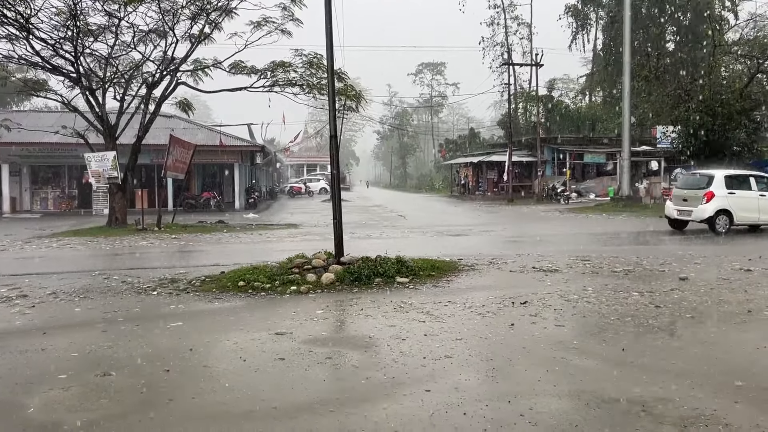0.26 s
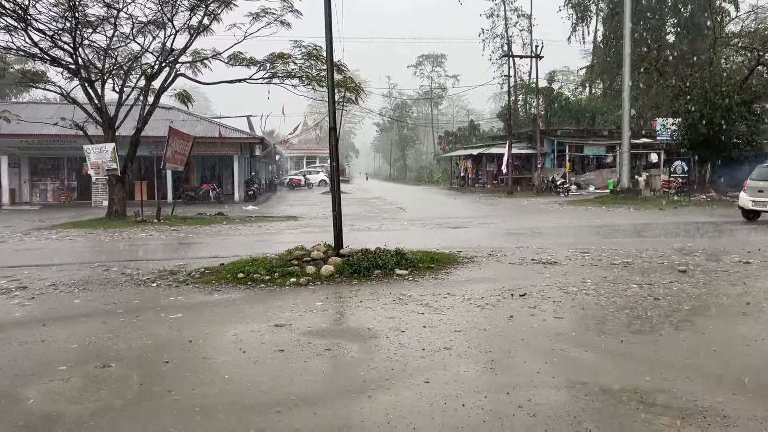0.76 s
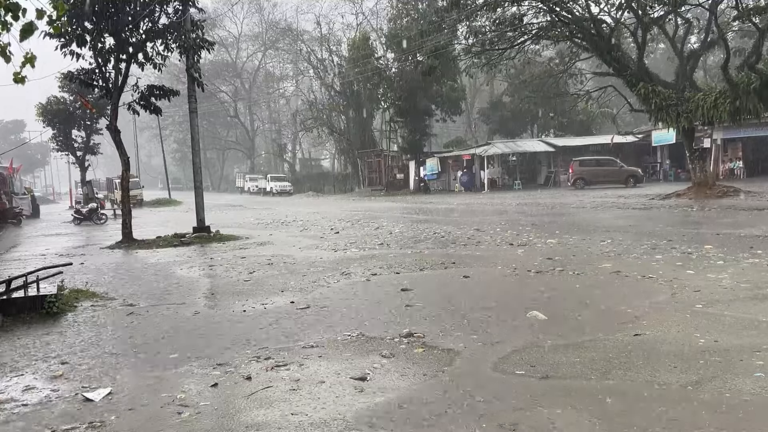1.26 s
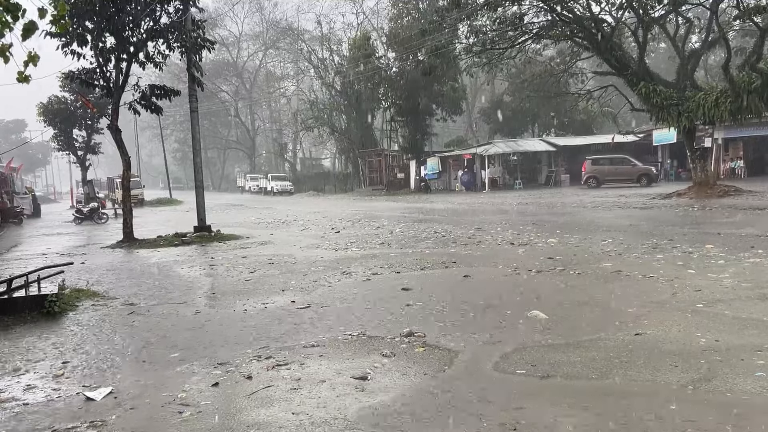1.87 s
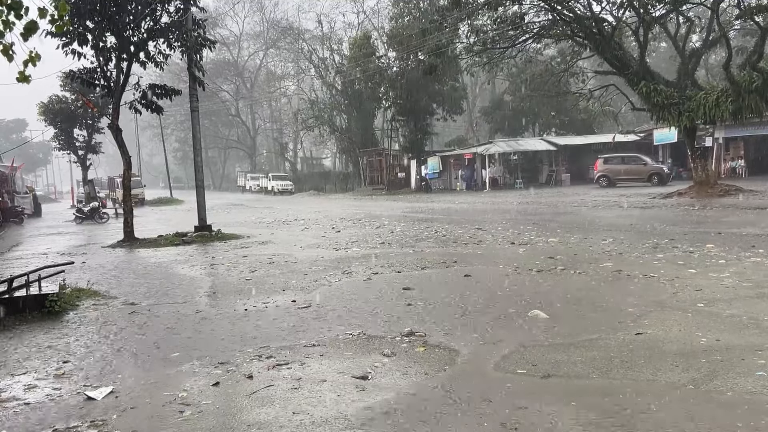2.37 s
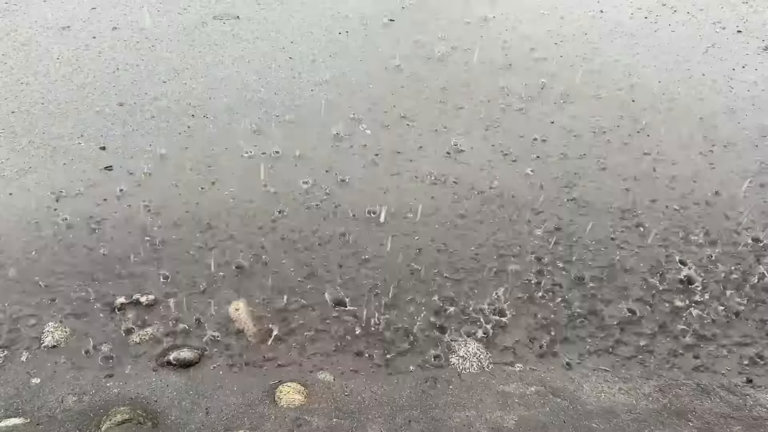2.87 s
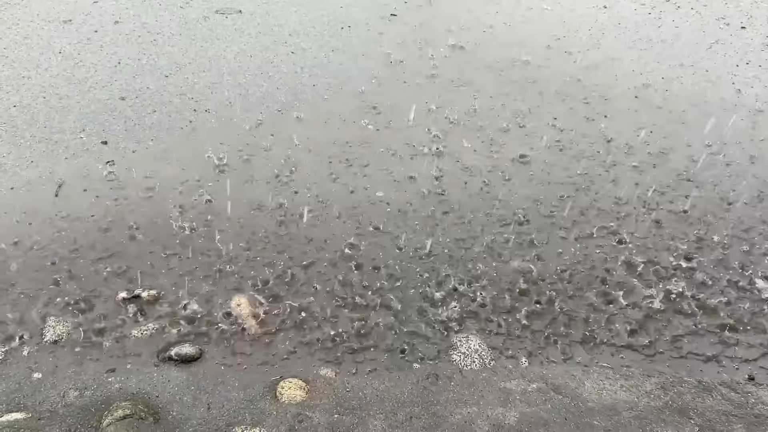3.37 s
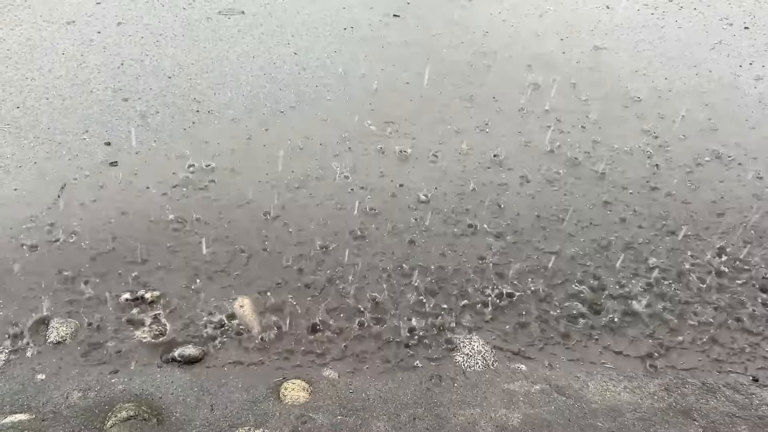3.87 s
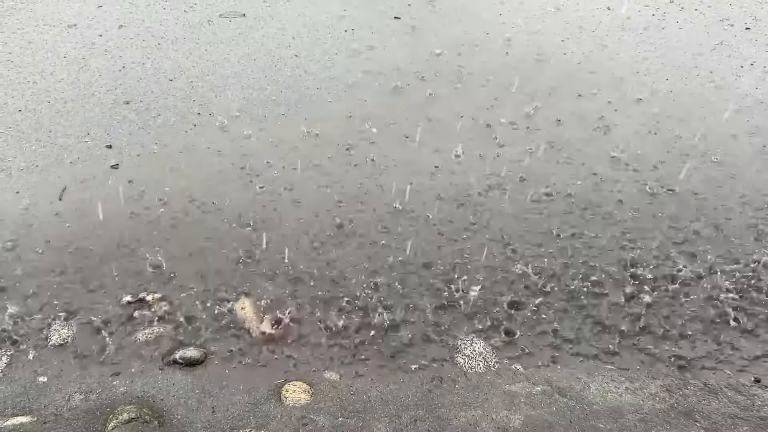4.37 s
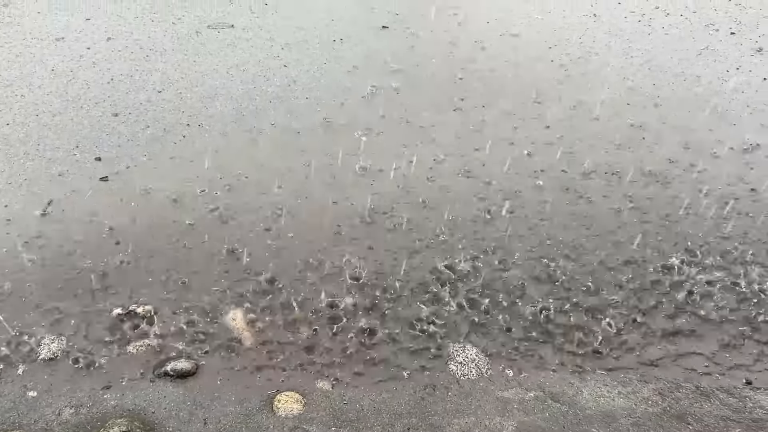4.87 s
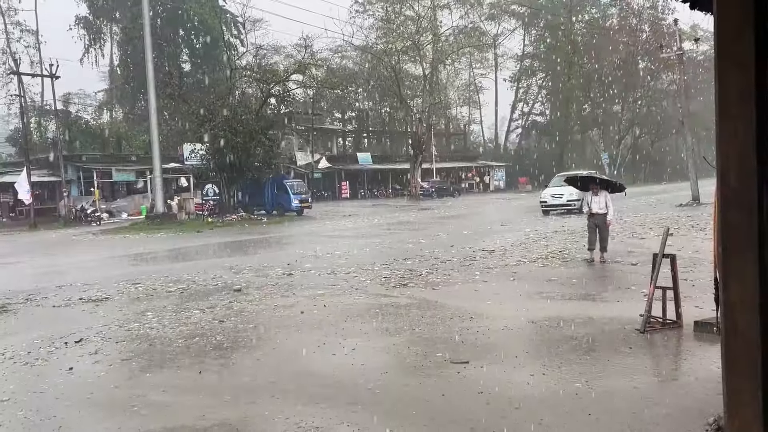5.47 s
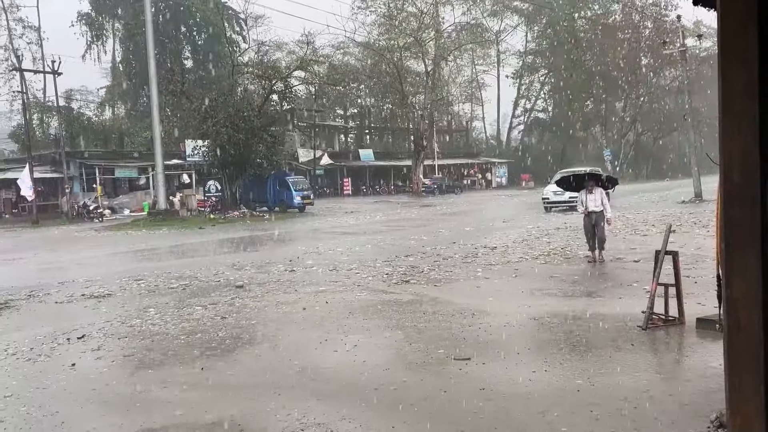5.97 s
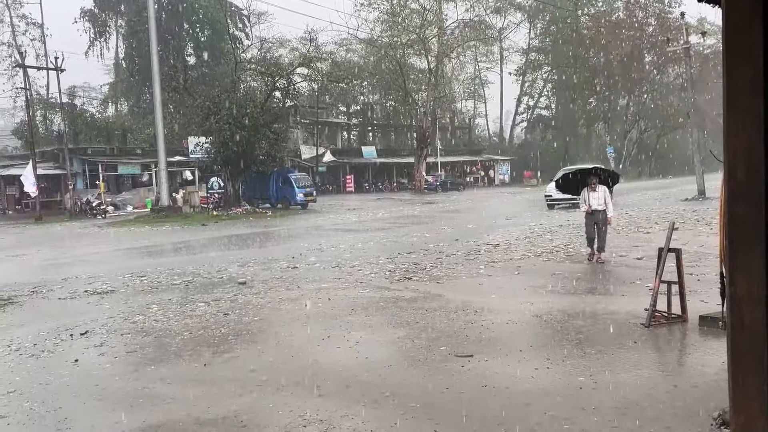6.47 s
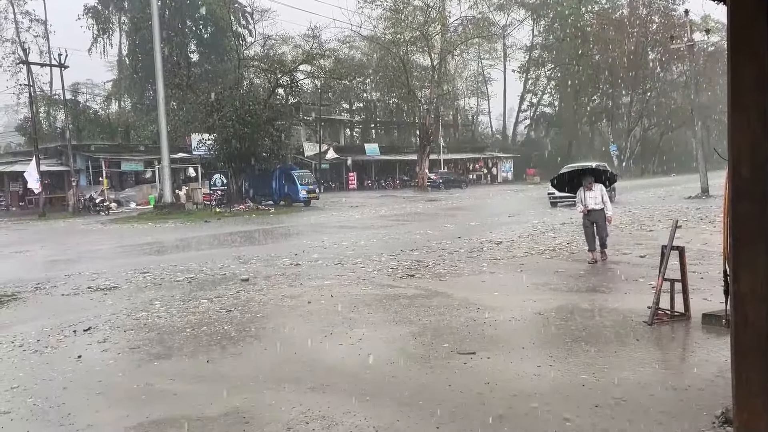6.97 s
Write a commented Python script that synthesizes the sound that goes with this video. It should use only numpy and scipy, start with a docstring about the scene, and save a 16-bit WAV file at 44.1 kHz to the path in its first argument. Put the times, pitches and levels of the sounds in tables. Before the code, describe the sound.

Dense downpour outdoors from under eaves, splashing puddles and low wind buffeting, with three brief cut-like dips and a late sliding cicada-like rasp.

```python
"""Downpour on a road junction

Heavy rain on a wet road, heard from under the eaves on a phone, from four standpoints in turn.
Filtered noise makes the far wash and the drumming roof; random impacts make the near ticks and spray.
Decaying sines ring in the puddles; low noise and one-cycle thumps are wind on the microphone.
Near the end a shrill buzz, probably a cicada, slides down and holds: tones of wandering phase."""
import sys
import numpy as np
from scipy import signal
from scipy.fft import rfft, irfft
from scipy.io import wavfile

SR = 44100
rng = np.random.default_rng(int(sys.argv[2]) if len(sys.argv) > 2 else 0)


def transcribe(u):
    """Save the signal u as a 16-bit wav file named by the first command-line argument.

    u: samples, shape (n,) or (channels, n), limited to [-1, 1]; the rate is SR.
    q: integer samples, one column per channel.
    """
    v = np.clip(np.atleast_2d(u).T, -1, 1)
    q = np.round(v * 32767).astype(np.int16)
    wavfile.write(sys.argv[1], SR, q)


N = 317520
TIME = np.arange(N) / SR
FREQ = np.maximum(np.arange(N // 2 + 1) * SR / N, 1)

# Levels in the tables are nominal: function trims, port balance and dips come on top.
# standpoints: [from t/s, far wash level/dB, near spatter level/dB, breeze level/dB, puddle level/dB]
STANDPOINTS = [(0, -18.5, -27.5, -31, -19), (.878, -19.55, -27, -29.5, -20.5),
               (2.899, -18, -25.5, -29.5, -17.5), (4.945, -19, -26, -35.5, -19.5)]
# at each change of standpoint the sound drops out and swells back
DIP_DB, DIP_RECOVERY_S, DIP_BEND = -20, 0.049, 1.55
# strength of the downpour: [t/s, level/dB]
SURGE = [(0, 0.4), (0.8, 0.2), (1.15, 0.8), (2.4, -0.5), (2.9, -0.1), (3.45, 0.5), (3.95, -0.5),
         (4.5, -0.8), (4.78, 0.5), (5.05, -1.15), (6.4, 0.93), (7.2, 0)]
SPATTER_FOLLOW = 0.24  # dB of near spatter per dB of surge
# rain colour without the roof: [f/Hz, relative density level/dB]
RAIN_COLOUR = [(25, -32), (55, -15), (170, -6), (330, -2), (600, -4), (850, -2.5), (1250, -3), (1580, -5),
               (1800, -10), (2900, -14), (4900, -15.5), (6800, -19), (11500, -19), (13000, -19.5),
               (15000, -22)]
# roof resonances: [f/Hz, width/Hz, lift/dB]
ROOF_MODES = [(163, 37, 3.5), (292, 8.8, 2.5), (427, 8.5, 4)]
# share of rain power from single near drops: [f/Hz, share/0-1]
NEAR_SHARE = [(600, 0.04), (1800, 0.01), (3500, 0.51), (8000, 0.72), (13000, 0.73)]
# wind rumble colour: [f/Hz, relative density level/dB]
RUMBLE_COLOUR = [(20, -36), (35, -14), (52, -4), (75, -3), (110, -9), (180, -12), (400, -36), (1500, -80)]
# gusts on the microphone: [middle t/s, length/s between 1/e power points, peak level/dB]
GUSTS = [(1.14, 0.11, -25), (1.276, 0.035, -27), (1.5, 0.062, -23), (1.67, .17, -28), (1.955, 0.067, -23),
         (2.198, .03, -24), (2.737, .08, -24), (3.07, 0.1, -24), (3.54, 0.045, -26), (3.732, .06, -24.5),
         (4.095, .05, -22), (4.225, 0.057, -22), (4.874, .05, -20), (6.76, .07, -29), (6.8, 0.53, -32)]
# single eddies thumping the microphone: [t/s, peak level/dB, f/Hz]
THUMPS = [(1.487, -18, 90), (1.508, -19, 62), (1.63, -12, 120), (1.657, -13, 65), (1.70, -15, 60),
          (1.735, -16, 72), (1.782, -18.5, 68), (1.961, -13.5, 66), (2.191, -10, 84), (2.355, -18, 155),
          (2.702, -17, 150), (2.725, -13, 110), (2.748, -15, 70), (2.888, -12.5, 115), (3.058, -18.5, 65),
          (3.092, -18, 85), (3.54, -17, 65), (3.725, -18, 60), (4.094, -16, 80), (4.228, -14.5, 70),
          (4.864, -8.5, 130), (4.879, -10, 75)]
# big drops close by: [t/s, level/dB, centre f/Hz, width/octaves, decay/s]
BIG_DROPS = [(.010, -16, 4000, .3, .0015), (.1275, -16, 4000, .3, .0014), (.1615, -15, 4500, .35, .0014),
             (.839, -14.5, 4200, .3, .0016), (1.0645, -13, 6500, .5, .0009),
             (1.1514, -8.5, 10000, .4, .0009), (1.2305, -16, 12500, .3, .0015),
             (1.244, -16.5, 6700, .25, .0015), (1.8601, -12, 3900, .25, .0022),
             (2.0087, -7.5, 12000, .3, .0009), (2.0886, -15, 8000, .5, .0009),
             (2.222, -17.5, 3400, .25, .0015), (2.6693, -16.5, 5300, .25, .0014),
             (2.8735, -16.5, 4400, .3, .0014), (2.976, -14, 12500, .3, .001), (3.148, -16, 7000, .3, .0014),
             (3.3195, -15, 6000, .8, .0012), (3.3987, -13, 7000, .55, .001), (3.848, -12, 11500, .3, .0008),
             (3.9005, -13.5, 7100, .25, .0018), (4.0629, -12, 11000, .4, .001),
             (4.1686, -11.5, 11000, .35, .0008), (4.7055, -16.5, 5300, .25, .0014),
             (4.865, -11.5, 11500, .3, .0008), (4.893, -17, 4900, .35, .0013),
             (5.151, -17.5, 3900, .3, .0014), (5.2311, -13, 4900, .25, .0013),
             (5.345, -17.5, 7000, .4, .0014), (5.5181, -9, 9500, .35, .0005),
             (5.7415, -13.5, 8400, .3, .0013), (6.054, -18, 4900, .2, .002),
             (6.1105, -16.5, 3700, .2, .0015), (6.349, -17.5, 7200, .25, .002),
             (6.5406, -17.5, 4000, .3, .0014), (6.636, -16.5, 5300, .3, .0014),
             (6.7976, -1.5, 8400, .7, .002), (6.8011, -7, 3700, .4, .0012)]
# heavy drips into the nearest puddle: [t/s, level/dB, f/Hz]
SPLATS = [(.559, -18, 2400), (.854, -13, 1100), (2.429, -16, 1100), (3.104, -13, 950), (4.923, -13, 1200),
          (5.239, -16, 1000), (5.783, -14, 950), (6.344, -18, 2100), (6.802, -12, 1100)]
# cicada pitch before flutter, high note, slide, held note: [t/s, f/Hz]
CICADA_PITCH = [(6.65, 8700), (6.695, 8800), (6.725, 8050), (6.76, 7150), (6.83, 6550), (6.96, 6500),
                (7.06, 6350), (7.12, 6100), (7.17, 6450), (7.2, 6350)]
# fixed resonances the call rings as it reaches them: [f/Hz, relative level/dB]
CICADA_MODES = [(5530, -4), (5860, -2.5), (6220, -6), (6490, -4), (6750, -6)]
CICADA_DB, CICADA_START_S, CICADA_ATTACK_S, CICADA_OCTAVE_RISE_S = -32.5, 6.63, 0.032, 0.18
FLUTTER_RATE_HZ, FLUTTER_PITCH_SHARE, FLUTTER_DB = 35, 0.008, 1.6
# microphone ports: [f/Hz, likeness/0-1, left-minus-right level/dB]
PORTS = [(100, 0.95, 1.1), (266, 0.88, 1.5), (553, 0.44, 1.7), (940, 0.23, 0.5), (1630, 0, -2.5),
         (1725, 0.74, 4.5), (3000, 0.33, 0), (4930, 0.29, 2.5), (5650, 0, 0), (6800, 0.86, 2),
         (10550, 1, -1.5), (15200, 0.56, 1)]
# above this pitch the left port trails the right
LAG_FROM_HZ, PORT_LAG_S = 7150, 0.000178
TOP_HZ = 15500


def undb(db):
    """Decibels to gain."""
    return 10 ** (np.asarray(db) / 20)


def unit(x):
    """Scale to rms 1."""
    return x / np.sqrt(np.mean(x ** 2))


def curves(rows):
    """Interpolate each column of (t/s, ..) rows at every sample."""
    s, *columns = np.transpose(rows)
    return [np.interp(TIME, s, c) for c in columns]


def over_pitch(rows, axis=1):
    """Interpolate one column of (f/Hz, ..) rows over log frequency."""
    rows = np.array(rows)
    return np.interp(np.log(FREQ), np.log(rows[:, 0]), rows[:, axis])


def colour(x, gain):
    """Filter by a gain per frequency."""
    return irfft(rfft(x) * gain, N)


def band_rms(gain, lo_hz, hi_hz):
    """In-band rms of white noise filtered by gain."""
    return np.sqrt(np.mean(gain ** 2 * (FREQ > lo_hz) * (FREQ < hi_hz)))


def walk(rate_hz):
    """Random wander of rms 1, up to about rate_hz changes a second."""
    knots = rng.standard_normal(int(2 * rate_hz * N / SR) + 2)
    return unit(np.interp(2 * rate_hz * TIME, np.arange(len(knots)), knots))


def fade(power, decay_s):
    """Exponential decay of each impact's power; decay_s is the amplitude time constant."""
    return signal.lfilter([1], [1, -np.exp(-2 / (decay_s * SR))], power + 1e-18)


def ports(ahead, around=None):
    """Left and right from a direct sound and, for a diffuse one, an unrelated twin from the sides."""
    likeness = 1 if around is None else np.clip(over_pitch(PORTS), 0, 1)
    mid = rfft(ahead) * np.sqrt((1 + likeness) / 2)
    side = 0 if around is None else rfft(around) * np.sqrt((1 - likeness) / 2)
    sign = np.array([[1], [-1]])
    lag = np.exp(-1j * np.pi * sign * PORT_LAG_S * np.maximum(FREQ - LAG_FROM_HZ, 0))
    balance = undb(sign * over_pitch(PORTS, axis=2) / 2)
    return irfft((mid + sign * side) * lag * balance, N)


def standpoint():
    """Levels of wash, spatter, breeze and puddles (dB) at the standpoint of each moment."""
    rows = np.array(STANDPOINTS)
    return rows[np.searchsorted(rows[1:, 0], TIME), 1:].T


def downpour():
    """Levels of far wash, near spatter and puddles (dB), following the strength of the rain."""
    wash_db, spatter_db, _, puddle_db = standpoint()
    surge_db, = curves(SURGE)
    return wash_db + surge_db, spatter_db + SPATTER_FOLLOW * surge_db, puddle_db + surge_db


def impacts(count, spread_db, largest_db):
    """Drops at random moments: many small, a few large."""
    when, size = rng.random((count, 2)).T
    db = np.minimum(-spread_db * np.log(1 - size), largest_db)
    return np.bincount((when * N).astype(int), undb(db), N)


def spatter(tick_s=0.00011, spray_s=0.013, spray_db=-21, shared=0.29):
    """Each near drop is a sharp tick, then a short hiss of spray; most favour one octave, some fill all."""
    wide = unit(impacts(count=14000, spread_db=1.5, largest_db=16.5))
    shared = np.clip(shared, 0, 1)
    pitch = np.clip(np.log2(FREQ / 800), 0, 4)
    spectrum = 0
    for octave in range(5):
        # the higher the octave, the more a few close drops stand out
        narrow = unit(impacts(count=7000, spread_db=2.5 + 0.14 * octave, largest_db=13 + 1.1 * octave))
        hits = shared * wide ** 2 + (1 - shared) * narrow ** 2
        power = fade(hits, tick_s) + undb(2 * spray_db) * fade(hits, spray_s)
        noise = np.sqrt(power) * rng.standard_normal(N)
        band = np.sqrt(np.maximum(1 - np.abs(pitch - octave), 0))
        spectrum = spectrum + rfft(noise) * band
    return unit(irfft(spectrum, N))


def rain(wash_db=-0.46, spatter_db=-1.5, sway_db=0.49, flutter_db=1.32):
    """Far wash fills the middle and rings the roof; near spatter takes over towards the treble."""
    far_db, near_db, _ = downpour()
    roof_db = sum(db / (1 + (2 * (FREQ - hz) / width_hz) ** 2) for hz, width_hz, db in ROOF_MODES)
    shape = undb(over_pitch(RAIN_COLOUR) + roof_db)
    share = np.clip(over_pitch(NEAR_SHARE), 0, 1)
    far_gain = undb(far_db) / band_rms(shape, 250, 2500)
    near_gain = undb(near_db) / band_rms(shape, 3000, 15000)
    wash = colour(rng.standard_normal((2, N)), shape * np.sqrt(1 - share))
    wash = wash * far_gain * undb(wash_db + sway_db * walk(6.9))
    near = colour([spatter(), spatter()], shape * np.sqrt(share))
    near = near * near_gain * undb(spatter_db + flutter_db * walk(23))
    return ports(*(wash + near))


def bubbles(count, low_hz, high_hz, cycles, rise, spread_db):
    """Trapped air rings briefly, rising in pitch as it nears the surface; each bubble has its own place."""
    out, t = np.zeros((2, N + SR // 24)), TIME[:SR // 24]
    for when, pitch, size, place in rng.random((count, 4)):
        hz = low_hz * (high_hz / low_hz) ** pitch
        age = t * hz / cycles
        ring = np.sin(2 * np.pi * hz * t * (1 + rise * age / 4)) * np.exp(-age)
        pan = np.cos(np.pi * place + np.array([[0], [np.pi / 3]]))
        start = int(when * N)
        out[:, start:start + len(t)] += pan * ring * undb(spread_db * size ** 2)
    return unit(out[:, :N])


def puddles(plop_db=-10.5, plink_db=-18.0, tinkle_db=-21.0):
    """Run-off plops into the puddles in spurts, while raindrops leave smaller, higher bubbles."""
    *_, puddle_db = downpour()
    plops = bubbles(count=1100, low_hz=762, high_hz=1636, cycles=10.3, rise=0.038, spread_db=7.5)
    plops = plops * undb(1.4 * walk(7))
    plinks = bubbles(count=900, low_hz=1699, high_hz=3797, cycles=17.5, rise=0.03, spread_db=11.0)
    tinkles = bubbles(count=900, low_hz=3620, high_hz=8430, cycles=37, rise=0.021, spread_db=11)
    mix = plops * undb(plop_db) + plinks * undb(plink_db) + tinkles * undb(tinkle_db)
    return mix * undb(puddle_db)


def airflow(buffet_db=1.5, buffet_rate_hz=7):
    """Wind strength: an unsteady breeze, with gusts that swell and die away on top."""
    breeze_db = standpoint()[2]
    power = undb(breeze_db + buffet_db * walk(buffet_rate_hz)) ** 2
    for s, length_s, db in GUSTS:
        power = power + undb(db) ** 2 * np.exp(-(2 * (TIME - s) / length_s) ** 2)
    return np.sqrt(power)


def wind(thump_db=-1, thump_cycles=0.68):
    """Gusts rumble on the ports; single eddies push the air for about one cycle."""
    rumble = unit(colour(rng.standard_normal((2, N)), undb(over_pitch(RUMBLE_COLOUR)))) * airflow()
    thumps = np.zeros(N)
    for s, db, hz in THUMPS:
        near = np.abs(TIME - s) < 2 / hz
        turns = (TIME[near] - s) * hz
        push = np.cos(2 * np.pi * turns) * np.exp(-(turns / thump_cycles) ** 2)
        thumps[near] += undb(db + thump_db) * push
    return ports(*rumble) + ports(thumps)


def big_drops(attack_s=0.00006, spray_db=-22, spray_s=0.0075):
    """A fat drop slaps the ground: a crack gone in a millisecond or two, then a patter of droplets."""
    out, t = np.zeros(N), TIME[:2048]
    hz = np.maximum(np.arange(len(t) // 2 + 1) * SR / len(t), 1)
    for s, db, centre_hz, octaves, decay_s in BIG_DROPS:
        band = np.exp(-.5 * (np.log2(hz / centre_hz) / octaves) ** 2)
        crack, droplets = rng.standard_normal((2, len(t)))
        crack = unit(irfft(rfft(crack) * band))
        droplets = unit(irfft(rfft(droplets ** 5) * band))  # fifth power: sparse spikes
        fall = np.exp(-t / decay_s)
        # energy of a decaying sine of peak 1
        crack = unit(np.tanh(crack) * fall) * np.sqrt(np.mean(fall ** 2) / 2)
        splash = crack + undb(spray_db) * droplets * np.exp(-t / spray_s)
        start = int(s * SR)
        out[start:start + len(t)] += splash * (1 - np.exp(-t / attack_s)) * undb(db)
    return ports(out)


def splats(splat_db=-1, cycles=4, rise=0.042, smack_db=-4, smack_s=0.002):
    """A heavy drip smacks the water, and the hollow it leaves rings for a few cycles."""
    out, t = np.zeros(N), TIME[:2048]
    for s, db, hz in SPLATS:
        age = t * hz / cycles
        ring = np.sin(2 * np.pi * hz * t * (1 + rise * age)) * np.exp(-age)
        band = signal.butter(2, [hz / 2, 2 * hz], "band", fs=SR)
        smack = unit(signal.lfilter(*band, rng.standard_normal(len(t))))
        smack = undb(smack_db) * np.tanh(smack) * np.exp(-t / smack_s)
        start = int(s * SR)
        out[start:start + len(t)] += (ring + smack) * undb(db + splat_db)
    return ports(out)


def cicada_call():
    """Pitch (Hz) and gain of the call; both flutter."""
    hz, = curves(CICADA_PITCH)
    attack = np.clip((TIME - CICADA_START_S) / CICADA_ATTACK_S, 0, 1)
    fluttered_hz = hz * (1 + FLUTTER_PITCH_SHARE * walk(FLUTTER_RATE_HZ))
    return fluttered_hz, undb(CICADA_DB + FLUTTER_DB * walk(FLUTTER_RATE_HZ)) * attack


def blurred(angle, width_hz):
    """A tone whose size and phase wander, which widens its line."""
    return unit(walk(width_hz) * np.cos(angle) + walk(width_hz) * np.sin(angle))


def cicada(line_hz=28, reach_hz=520, core_hz=160, core_db=-3, rasp_hz=750, rasp_db=-2,
           octave_hz=1400, octave_db=-1):
    """A rasping note slides through fixed resonances, ringing each; a hoarse octave builds up above it."""
    hz, gain = cicada_call()
    phase = 2 * np.pi * np.cumsum(hz) / SR
    buzz = np.zeros(N)
    for mode_hz, db in CICADA_MODES:
        closeness = 1 / (1 + ((hz - mode_hz) / reach_hz) ** 2)
        buzz += undb(db) * blurred(2 * np.pi * mode_hz * TIME, line_hz) * closeness
    rasp = undb(core_db) * blurred(phase, core_hz) + undb(rasp_db) * blurred(phase, rasp_hz)
    build = np.clip((TIME - CICADA_START_S) / CICADA_OCTAVE_RISE_S, 0, 1)
    octave = undb(octave_db) * build * blurred(2 * phase, octave_hz)
    return ports((buzz + rasp + octave) * gain)


def dips():
    """Gain that falls at once at each new standpoint and climbs back within DIP_RECOVERY_S."""
    gain = np.ones(N)
    for s, *_ in STANDPOINTS[1:]:
        back = np.clip((TIME - s) / DIP_RECOVERY_S, 0, 1)
        gain *= np.where(TIME < s, 1, undb(DIP_DB * (1 - back) ** DIP_BEND))
    return gain


def scene():
    """Sum of all sources at the two ports, with the dips."""
    return (rain() + puddles() + wind() + big_drops() + splats() + cicada()) * dips()


def record(dry):
    """The phone thins the deepest rumble, clips at full scale and cuts the top."""
    thinned = signal.sosfilt(signal.butter(2, 28, "high", fs=SR, output="sos"), dry)
    clipped = np.clip(thinned, -1, 1)
    return signal.sosfilt(signal.ellip(10, .1, 80, TOP_HZ, fs=SR, output="sos"), clipped)


dry = scene()
out = record(dry)
transcribe(out)
```